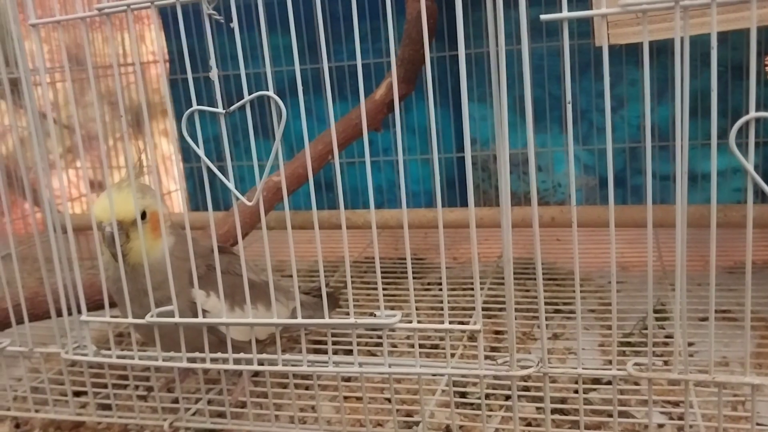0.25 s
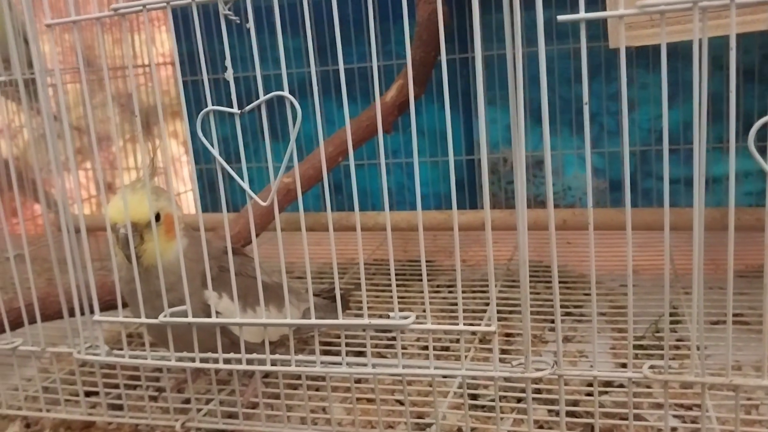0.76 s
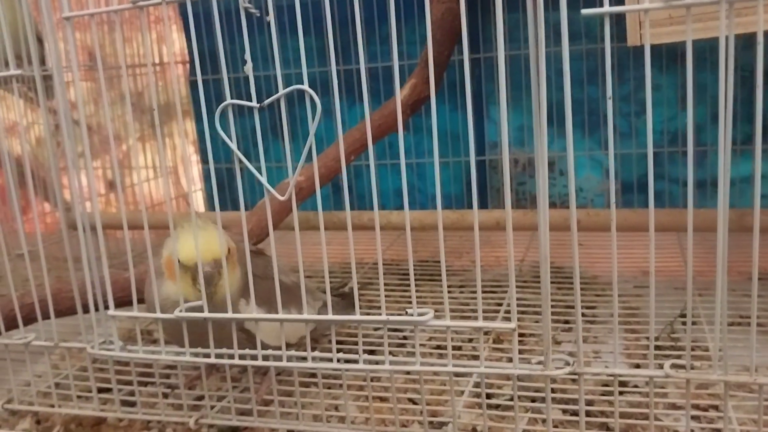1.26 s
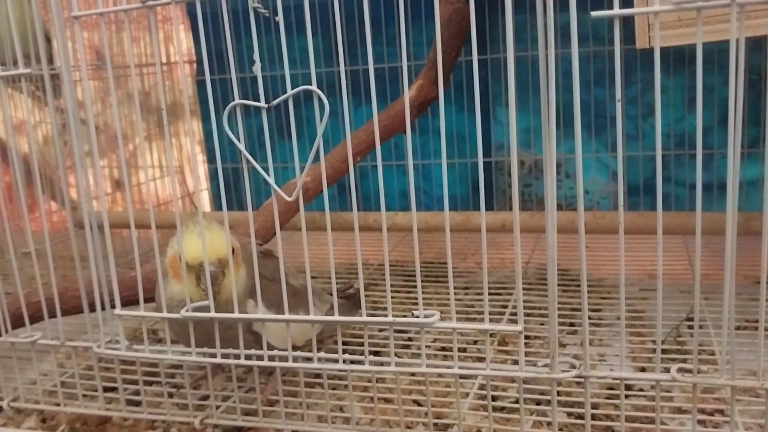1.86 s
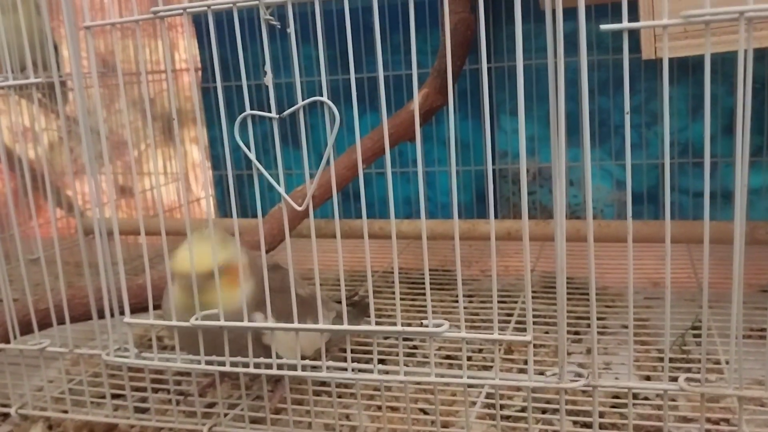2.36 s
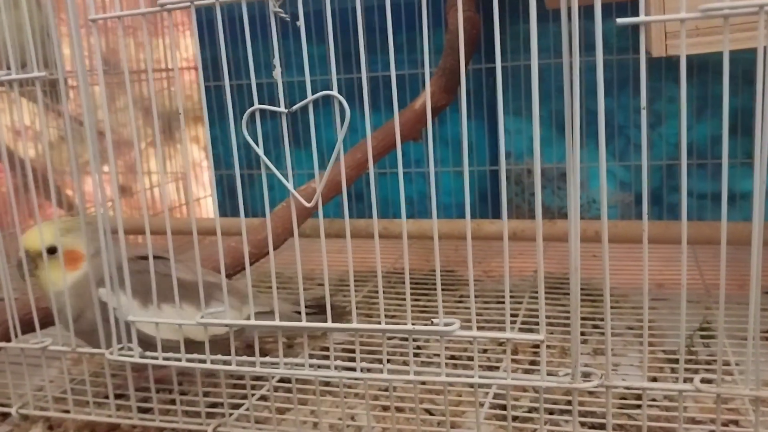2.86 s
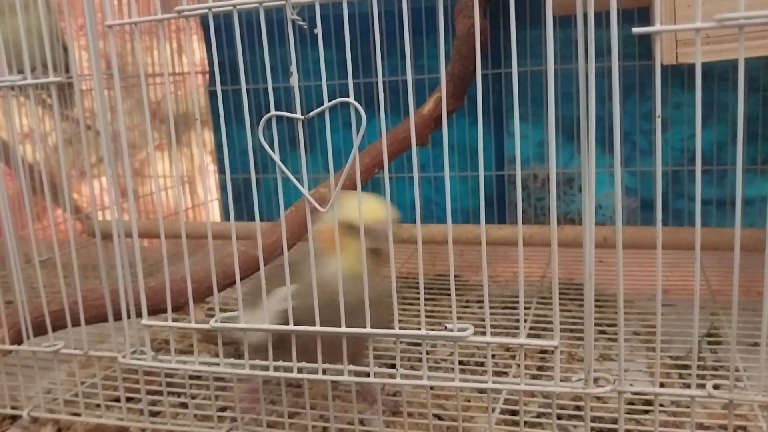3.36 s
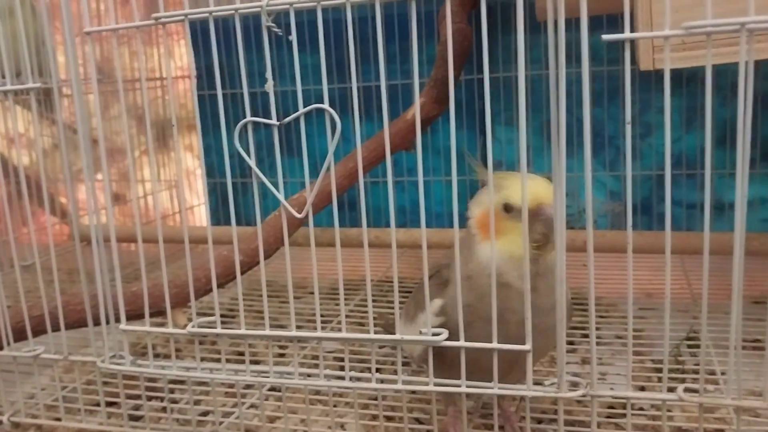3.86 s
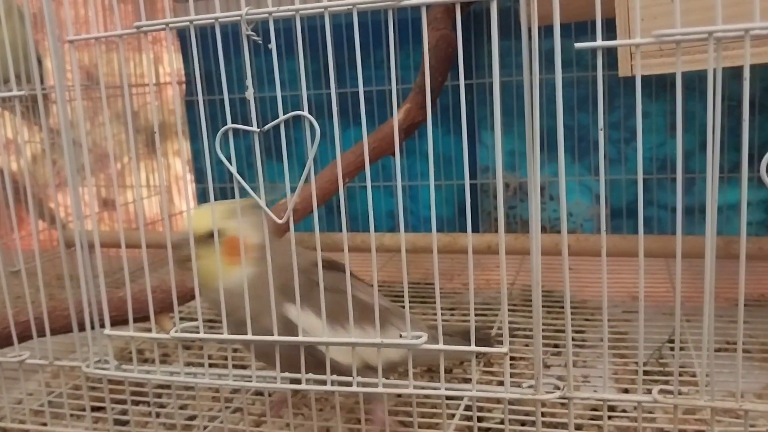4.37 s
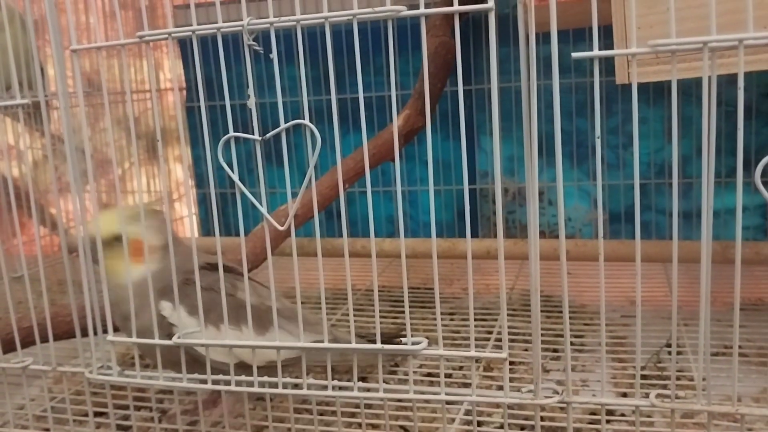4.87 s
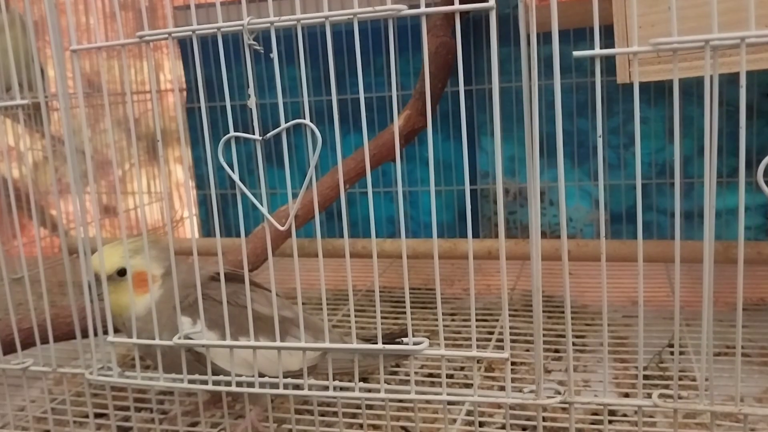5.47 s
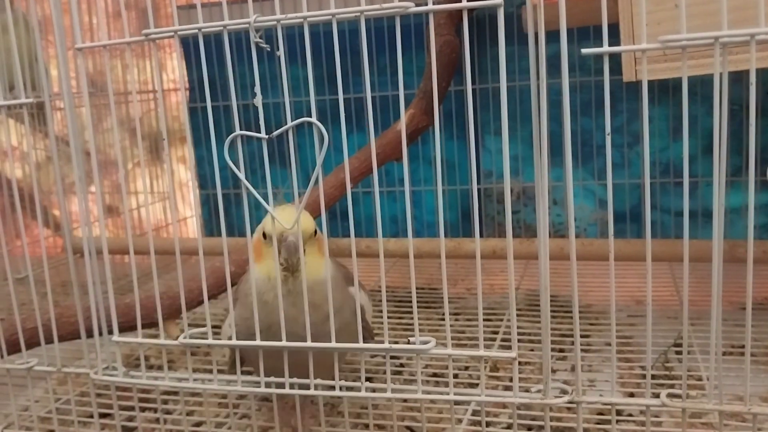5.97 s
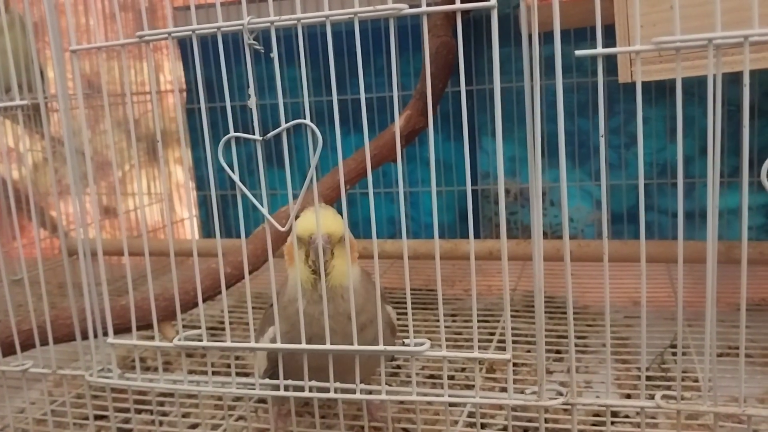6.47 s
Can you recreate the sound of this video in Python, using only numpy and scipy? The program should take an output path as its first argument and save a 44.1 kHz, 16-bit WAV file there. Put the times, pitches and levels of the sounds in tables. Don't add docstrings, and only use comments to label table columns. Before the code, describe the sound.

A hard room with a low motor hum near 65 Hz, rumble and soft hiss. The background starts subdued and rises during the first second, with a broad distant hiss swelling around 1.3 s. Thin far squeaks, mostly 2-5.5 kHz, cluster from 0 to 2.5 s. A light wire rattle comes at 1.4 s, dry claw ticks at 2.2-2.4 s, and small bright rattles at 2.5-3.2 s. At 3.25 s a loud quarter-second whistle sweeps up from 1.8 to 3.4 kHz, warbling on the glide, clean at the top, then falls. A similar whistle follows at 4.2 s, reaching about 3.5 kHz. Each rings briefly off the walls and the background drops sharply. Faint steps and tiny squeaks remain; at 6.1 s a soft reedy 0.2-second chirp pulses near 750 Hz. The hum recovers slowly until the end at 6.7 s.

```python
import sys
import numpy as np
from scipy import signal
from scipy.fft import rfft, irfft
from scipy.io import wavfile
from scipy.ndimage import uniform_filter1d, minimum_filter1d

SR = 44100
rng = np.random.default_rng(int(sys.argv[2]) if len(sys.argv) > 2 else 0)


def digitize_waveform(pressure):
    field = np.atleast_2d(pressure).T
    bounded = np.clip(field, -1, 1)
    quanta = np.round(bounded * 32767).astype(np.int16)
    wavfile.write(sys.argv[1], SR, quanta)


def invert_db(x):
    u = np.asarray(x, float) / 20
    return 10 ** u


N = 296352

# frequency in Hz, level in dB per Hz.
ROOM_TONE_DB = [(160, -33), (280, 0.5), (326, -1.5), (490, -7), (670, -7.5), (990, -9.5), (1250, -16),
                (2600, -17), (3390, -26), (5250, -34), (8100, -41), (8700, -48.5), (11500, -54.5),
                (15800, -68)]
# frequency in Hz, level in dB per Hz.
RUMBLE_DB = [(18, -45.5), (30, -27), (40, 1), (55, 2), (78, -13.5), (98, 0.5), (150, 2), (172, -3),
             (220, 2.5), (280, -10), (400, -52.5)]
# frequency in Hz, correlation from -1 to 1.
LIKENESS = [(60, 0.87), (150, 0.82), (380, 0.81), (950, -0.097), (2380, -0.08), (5980, 0.05),
            (15000, -0.56)]
# time in seconds, shaft speed in Hz, load from -1 to 1.
MOTOR_RUN = [(0, 64.75, -0.35), (.7, 65.11, 0.34), (1.2, 64.68, -0.75), (1.8, 63.38, 0.38),
             (2.4, 64.29, -.2), (3.1, 64.5, 0.49), (4.4, 64.9, .7), (5, 65.56, 1.), (5.5, 64.66, 0.85),
             (5.85, 64.96, -.8), (6.3, 64.97, 0.23), (6.72, 64.64, .6)]
# idle level in dB, change in dB per unit load.
SHAFT_ORDERS_DB = [(-1.5, 1.5), (1.5, 10), (4.2, -1.2), (-3, 2.5), (-6.5, 2.5), (-15, 2)]
# start in seconds, gain drop in dB.
GAIN_TRIPS = [
    (-.64, -12.3),
    (3.275, -13.7),
    (4.2, -14.5),
]
# start in seconds, length in seconds, pitch in Hz, level in dB.
FAR_SQUEAKS = [(.0, .31, 2775, -64), (.13, .06, 8800, -74), (.34, .24, 5260, -76), (.52, .6, 4130, -77),
               (0.625, .46, 5230, -76), (.845, .06, 8650, -66), (.85, .13, 2170, -55),
               (1.0, .18, 2170, -57), (.66, .6, 2730, -60), (1.6, .72, 2785, -55), (1.42, .12, 2150, -59),
               (2.3, .1, 3660, -63), (1.28, .24, 2730, -53), (1.26, .7, 2715, -57), (1.554, .22, 4988, -67),
               (1.725, .17, 5585, -52), (1.89, .09, 5580, -58), (1.98, .1, 5570, -61),
               (1.78, .15, 11136, -80), (1.75, .25, 2262, -61), (1.7, .31, 3650, -68),
               (4.545, .14, 5100, -75), (5.1, .055, 8700, -71), (5.362, .043, 8670, -72)]
# start in seconds, peak in dB, lower band in relative dB, left-right in dB.
FOOTSTEPS = [(1.3871, -45.5, -5.5, -2.5), (2.2754, -65.5, 4, 2.5), (2.5249, -46.5, -11.5, -1),
             (2.7297, -47, -18, 0), (2.9052, -50, -11, -7), (3.1325, -57, -4, -5.5),
             (3.1782, -52.5, -9, -6.5), (3.7519, -68.5, 0, -8.5), (3.7985, -54, -9, -5.5),
             (4.0396, -65.5, 1, 3), (4.1001, -68.5, -9.5, -8), (4.557, -59, -9, -14),
             (4.7252, -68.5, 0.5, 2), (4.781, -66, -10, 0), (4.8403, -69, -1, -8.5),
             (4.9994, -71.5, 0.5, -14.5), (5.7685, -74, 6, -9), (5.8494, -65, -5, -11.5),
             (5.9383, -56.5, -15, -1), (6.0877, -57.5, 6, -9.5)]
# frequency in Hz, level in dB per Hz.
WIRE_DB = [(4710, -31), (8000, -5), (10200, -12.5), (11400, -3.5), (14000, -2), (14500, -6.5), (15700, -4)]
# frequency in Hz, level in dB per Hz.
LOW_WIRE_DB = [(2500, -21), (4500, 3.5), (7000, -4.5), (9000, -6.5), (11000, -34)]
# start in seconds, peak in dB, centre in Hz.
CLAW_TICKS = [
    (2.2143, -33.5, 6125),
    (2.2756, -48, 4920),
    (2.3864, -57, 4110),
]
# time in seconds, pitch in Hz, effort in dB.
FIRST_WHISTLE = [
    (3.249, 1760, -23.5),
    (3.266, 2328, -16),
    (3.298, 2660, -12.5),
    (3.309, 3196, -12.5),
    (3.33, 3360, -12),
    (3.402, 3448, -11),
    (3.44, 3368, -15.5),
    (3.468, 3190, -20),
    (3.491, 1650, -31),
]
# time in seconds, pitch in Hz, effort in dB.
SECOND_WHISTLE = [
    (4.215, 1870, -37.5),
    (4.25, 2530, -21.5),
    (4.284, 2896, -23),
    (4.291, 3390, -11.5),
    (4.312, 3464, -9.5),
    (4.365, 3492, -9.5),
    (4.408, 3373, -12.5),
    (4.425, 3082, -18.5),
    (4.457, 1882, -35.5),
]
# pitch in Hz, level in dB.
SECOND_HARMONIC_DB = [(1800, 9), (2400, -6), (2800, -20), (3300, -26), (3480, -23)]
THIRD_HARMONIC_DB = [(1800, -7), (2400, -16), (2800, -29.5), (3300, -33), (3480, -27)]
# frequency in Hz, level in dB.
UPPER_COLOUR_DB = [(5000, 1), (7000, 0.5), (8500, -5), (9500, -10), (11500, -2.5), (13000, -9.5),
                   (15500, -7.5)]
# frequency in Hz, level in dB.
CHIRP_THROAT_DB = [(740, -25), (1500, -17), (2200, -12.5), (3000, -4), (3700, -1.5), (5200, -8.5),
                   (6000, -11.5), (7500, -26), (9000, -33), (10400, -30), (11800, -18), (12800, -22),
                   (15000, -31.5)]
# delay in seconds, share of the direct sound.
NEAR_ECHOES = [
    [(.0011, 0.16), (.0021, .3), (.0047, -.25), (.0083, 0.24)],
    [(.0008, -0.028), (.0016, -.3), (.0039, 0.076), (.0072, -0.26)],
]
# frequency in Hz, t60 in seconds.
WALL_T60_S = [(1500, .5), (2400, 0.35), (3400, 0.58), (7000, 0.4), (14000, 0.73)]
# frequency in Hz, level in dB.
SCATTER_DB = [(1500, -5.5), (2400, 5.5), (3000, 3), (3500, -6), (7000, -1), (14000, 2.5)]


def evened(x):
    return x / np.sqrt(np.mean(x ** 2) + 1e-20)


def read(points, hz):
    f, value = np.transpose(points)
    return np.interp(np.log(hz + 1), np.log(f + 1), value)


def add(mix, start_s, sound, pan_db=0., lag=0):
    for side, shift, gain in ((0, lag, 0.39), (1, 0, -0.34)):
        part = mix[side, round(start_s * SR) + shift:][:len(sound)]
        part += (sound * invert_db(gain * np.asarray(pan_db) / 2))[:len(part)]


def highpass_or_low(x, hz, kind):
    return signal.sosfilt(signal.butter(2, hz, kind, fs=SR, output="sos"), x)


def wander(count, hz):
    return evened(highpass_or_low(rng.standard_normal(count + SR), hz, "low")[SR:])


def wavering(count, hz, width_hz, swing_db):
    pitch_hz = hz + width_hz * wander(count, 10. + width_hz)
    level = np.sqrt(2) * invert_db(swing_db * wander(count, 5.4))
    return level * np.sin(2 * np.pi * np.cumsum(pitch_hz) / SR)


def coloured(x, points):
    gain = invert_db(read(points, np.fft.rfftfreq(len(x), 1 / SR)))
    return evened(irfft(rfft(x) * gain, len(x)))


def room_tone():
    frames, hz = N // 2048 + 5, np.fft.rfftfreq(8192, 1 / SR)
    a, b, c, d, patches = rng.standard_normal((frames, 4097, 5)).T
    patches = uniform_filter1d(patches, size=60, axis=0)
    patches = evened(uniform_filter1d(patches, size=2, axis=1))
    same = np.clip(read(LIKENESS, hz), -1, 1)[:, None]
    left = a + 1j * b
    right = same * left + np.sqrt(1 - same ** 2) * (c + 1j * d)
    level = np.hypot(invert_db(read(ROOM_TONE_DB, hz)), invert_db(read(RUMBLE_DB, hz) + 4.5))
    spectrum = np.array([left, right]) * level[:, None] * invert_db(1.1 * patches)
    return evened(signal.istft(spectrum, nperseg=8192, noverlap=6144)[1][:, :N])


def passing_hiss(tone):
    swell_s, width_s, peak_db, above_hz = 1.3, .85, -1.5, 1500.
    swell = invert_db(peak_db) * np.exp(-((np.arange(N) / SR - swell_s) / width_s) ** 2)
    return swell * highpass_or_low(tone[:, ::-1], above_hz, "high")


def motor():
    s, *columns = np.transpose(MOTOR_RUN)
    hz, load = (np.interp(np.arange(N) / SR, s, c) for c in columns)
    return sum(invert_db(idle_db + per_load_db * load - 11.0) * wavering(N, k * hz, .18 * k, 2.5)
               for k, (idle_db, per_load_db) in enumerate(SHAFT_ORDERS_DB, 1))


def gain_control_db():
    open_db, overshoot_db = -38.6, -2.5
    clamp_s, settle_s, hold_s, recover_s = 0.055, .2, 1.27, .38
    s, drop_db = np.transpose(GAIN_TRIPS)[:, :, None]
    since_s = np.arange(N) / SR - s
    held_db = drop_db + overshoot_db * np.exp(-abs(since_s) / settle_s)
    held_db = held_db * np.clip(since_s / clamp_s, 0, 1)
    recovery = np.exp(-np.maximum(since_s - hold_s, 0) / recover_s)
    return open_db + (held_db * recovery).min(0)


def squeaks():
    out = np.zeros((2, N))
    for start_s, length_s, hz, db in FAR_SQUEAKS:
        width_hz = 180. if length_s < .07 else 12.
        count = int(length_s * SR)
        arch_hz = hz * (1 - .008 * np.linspace(-1, 1, count) ** 2)
        squeak = invert_db(db) * wavering(count, arch_hz, width_hz, 2.2)
        add(out, start_s, squeak * signal.windows.tukey(count, .45), lag=3)
    return out


def feet():
    rattle_t60_s, tick_decay_s = .165, .0003
    out, t = np.zeros((2, N)), np.arange(6000) / SR
    for start_s, db, low_db, pan_db in FOOTSTEPS:
        grain = rng.standard_normal((len(t), 3))
        rattle = coloured(grain[:, 0], WIRE_DB)
        rattle = rattle + invert_db(low_db + 2.0) * coloured(grain[:, 1], LOW_WIRE_DB)
        bars_db = list(zip(np.arange(2000, 17000, 700), 2.1 * grain[:22, 2]))
        rattle = np.std(rattle) * coloured(rattle, bars_db)
        lumps = invert_db(3. * evened(uniform_filter1d(grain[:, 2], size=120)))
        decay = invert_db(db - 7.0 - 60 * (t / rattle_t60_s) ** 1.3)
        add(out, start_s, decay * rattle * lumps * np.minimum(t / .002, 1), pan_db)
    for start_s, db, hz in CLAW_TICKS:
        ring = np.sin(2 * np.pi * hz * t) + 0.28 * np.sin(2 * np.pi * 2.1 * hz * t)
        add(out, start_s, invert_db(db) * np.exp(-t / tick_decay_s) * ring)
    return out


def whistle(rows, warble_hz, start_turn, fall_db, even_db, bright_db, shut_db, top_pan_db, glide_pan_db):
    warble_depth, jitter, release_s = .035, .014, .012
    s, *columns = np.transpose(rows)
    t = np.arange(s[0], s[-1], 1 / SR)
    hz, first_db = (np.interp(t, s, c) for c in columns)
    second_db = first_db + read(SECOND_HARMONIC_DB, hz) + .6 * bright_db
    third_db = first_db + read(THIRD_HARMONIC_DB, hz) + bright_db
    gliding = np.clip((1 - hz / hz.max()) / .06 - .6, 0, 1)
    closing_db = shut_db * gliding * (t > t[hz.argmax()])
    warble = np.sin(2 * np.pi * (warble_hz * (t - s[0]) + start_turn))
    rough = gliding * (warble_depth * warble + jitter * wander(len(t), 270.))
    hz = hz * (1 + rough + 0.0018 * wander(len(t), 200.))
    phase = 2 * np.pi * np.cumsum(hz) / SR
    tone = invert_db(first_db) * np.sin(phase)
    tone += invert_db(second_db + 1.1 * closing_db) * np.sin(2 * phase)
    for k in range(3, 9):
        db = third_db + .55 * closing_db - fall_db * (k - 3) + even_db * (k % 2 == 0)
        tone += invert_db(db + read(UPPER_COLOUR_DB, k * hz)) * (k * hz < 15800) * np.sin(k * phase)
    tone *= invert_db(1.3 * gliding * wander(len(t), 150.)) * np.minimum((s[-1] - t) / release_s, 1)
    pan_db = top_pan_db + (glide_pan_db - top_pan_db) * gliding
    return s[0], np.sqrt(2) * tone * signal.windows.tukey(len(t), .02), pan_db


def chirp():
    start_s, length_s, pitch_hz, peak_db, pan_db = 6.1, .21, 746, -35, -4
    sag, fade_db, peak_at, flatness = .15, -16, .53, 2.8
    t = np.arange(0, length_s, 1 / SR)
    slack = abs(t / length_s / peak_at - 1) ** flatness
    hz, effort_db = pitch_hz * (1 - sag * slack), peak_db + fade_db * slack
    turns = np.cumsum(hz * (1 + 0.0072 * wander(len(t), 120.))) / SR
    pulses = np.zeros(len(t))
    for k in range(1, 22):
        level = invert_db(2.5 * wander(len(t), 25.))
        pulses += level * np.cos(2 * np.pi * (k * turns + .4 * rng.random()))
    air = (0.49 + np.exp(-(turns % 1) / 0.89)) * rng.standard_normal(len(t))
    voice = coloured(evened(pulses) + (.06 + .3 * slack) * air, CHIRP_THROAT_DB)
    return start_s, invert_db(effort_db) * voice * signal.windows.tukey(len(t), .1), pan_db


def walls(x, near_db, wet_db):
    taps = np.zeros((2, SR))
    at = np.arange(100, SR - 20, 20) + rng.integers(0, 20, (2, (SR - 101) // 20))
    np.put_along_axis(taps, at, rng.choice([-1., 1.], at.shape), 1)
    hz, t, z = signal.stft(taps, SR, nperseg=256)
    z = z * invert_db(-60 * t / read(WALL_T60_S, hz)[:, None])
    tail = signal.istft(z, SR, nperseg=256)[1][:, :SR]
    near = taps * invert_db(-60 * np.arange(SR) / SR / 0.12)
    room = invert_db(wet_db) * tail / np.linalg.norm(tail[0])
    room = room + invert_db(near_db) * near / np.linalg.norm(near[0])
    room = irfft(rfft(room) * invert_db(read(SCATTER_DB, np.fft.rfftfreq(SR, 1 / SR))), SR)[:, :SR // 2]
    room[:, 0] = 1
    for side, echoes in enumerate(NEAR_ECHOES):
        for delay_s, share in echoes:
            room[side, round(delay_s * SR)] += share
    return signal.fftconvolve(x, room, axes=1)[:, :N]


def scene():
    tone = room_tone()
    background = invert_db(gain_control_db() + 7.) * (tone + passing_hiss(tone) + motor())
    bird = np.zeros((2, N))
    add(bird, *whistle(FIRST_WHISTLE, warble_hz=76., start_turn=.9, fall_db=1.5, even_db=1.2, bright_db=-1.5,
                       shut_db=-12.5, top_pan_db=-12., glide_pan_db=-11.5), lag=3)
    add(bird, *whistle(SECOND_WHISTLE, warble_hz=86., start_turn=.75, fall_db=3., even_db=-9., bright_db=3.5,
                       shut_db=-4.5, top_pan_db=1.5, glide_pan_db=-9.5), lag=3)
    add(bird, *chirp(), lag=2)
    return walls(bird, -7.0, -29.0) + walls(feet(), -7.5, -25.5) + squeaks() + background


def roll_off(x):
    return signal.sosfilt(signal.butter(12, 15830, fs=SR, output="sos"), x)


def record(dry):
    peak = -minimum_filter1d(-abs(dry).max(0), size=400)
    level = uniform_filter1d(peak, size=200)
    return roll_off(dry * np.minimum(1, 0.81 / level))


dry = scene()
out = record(dry)
digitize_waveform(out)
```